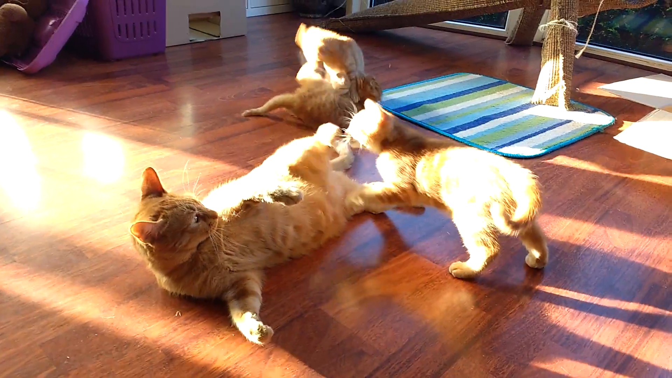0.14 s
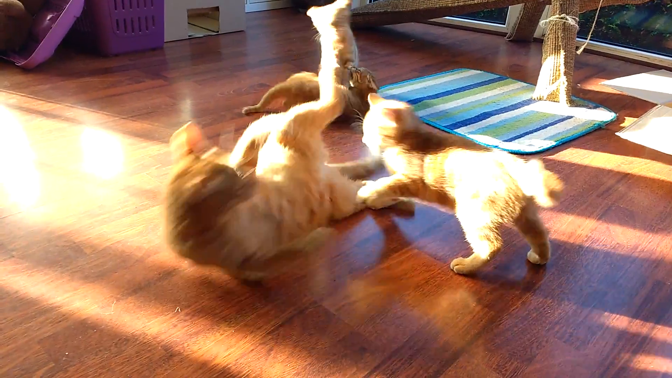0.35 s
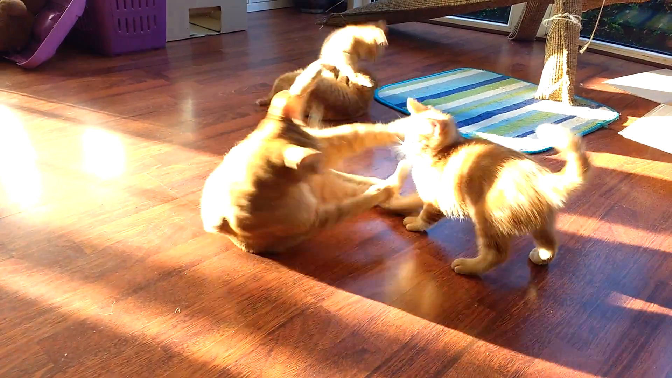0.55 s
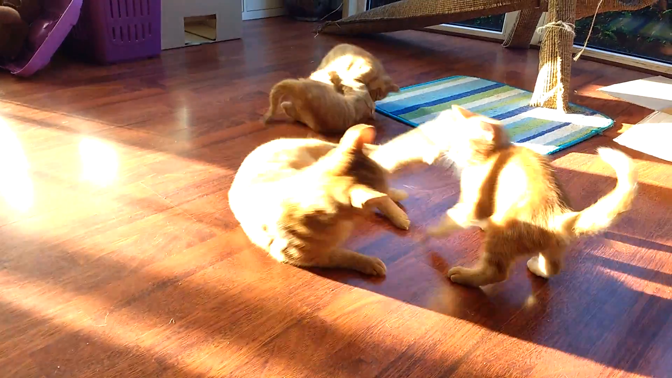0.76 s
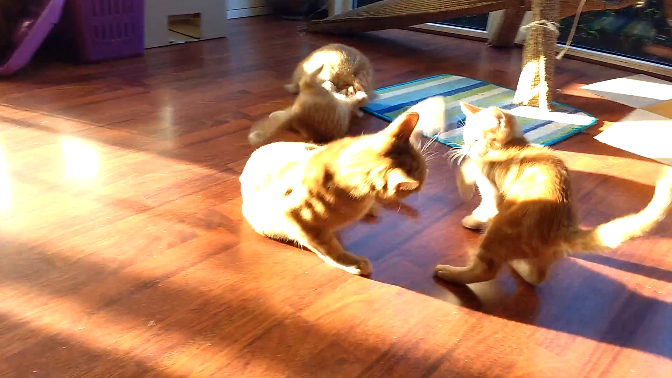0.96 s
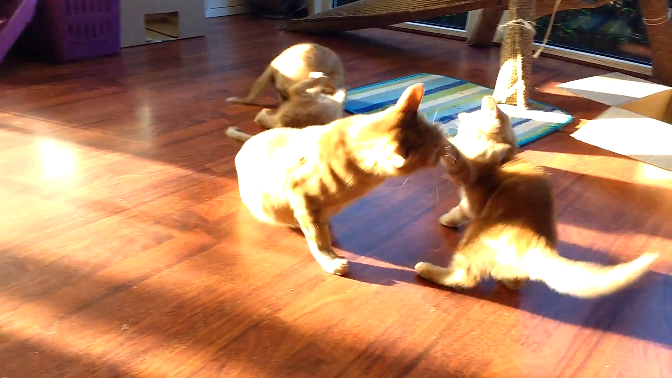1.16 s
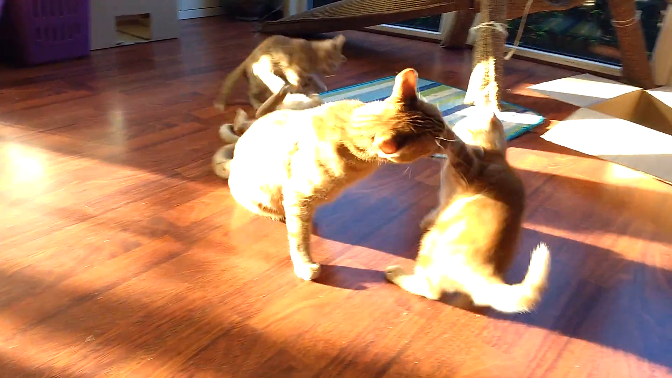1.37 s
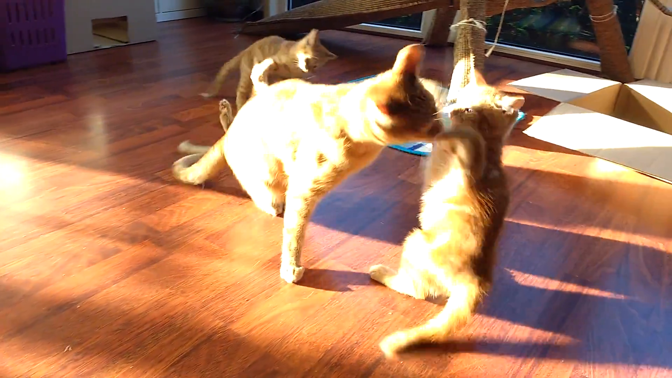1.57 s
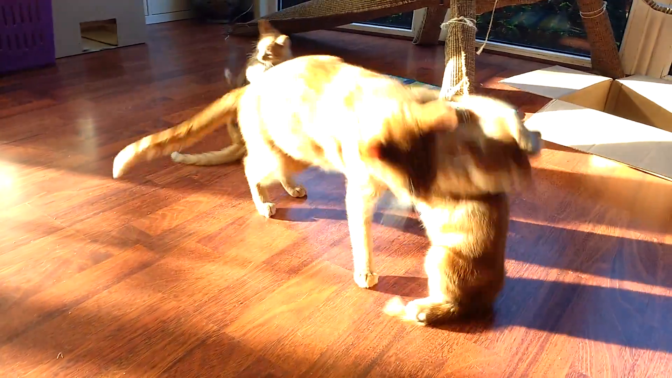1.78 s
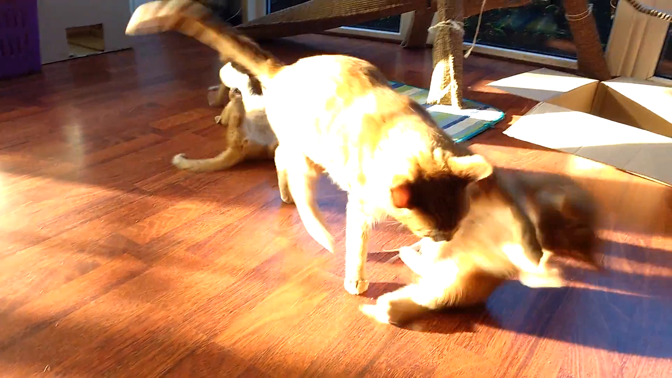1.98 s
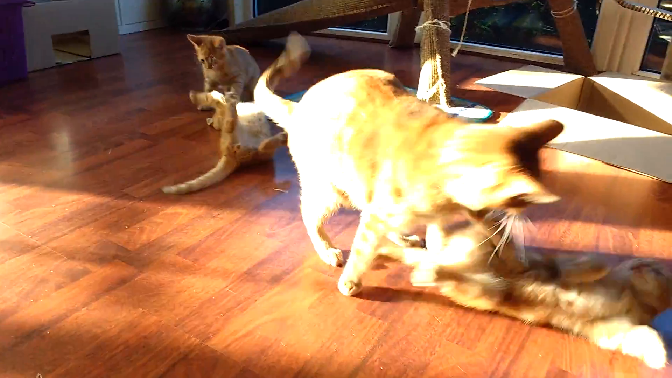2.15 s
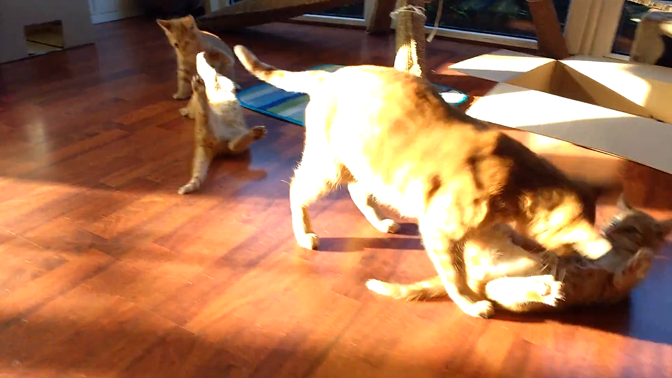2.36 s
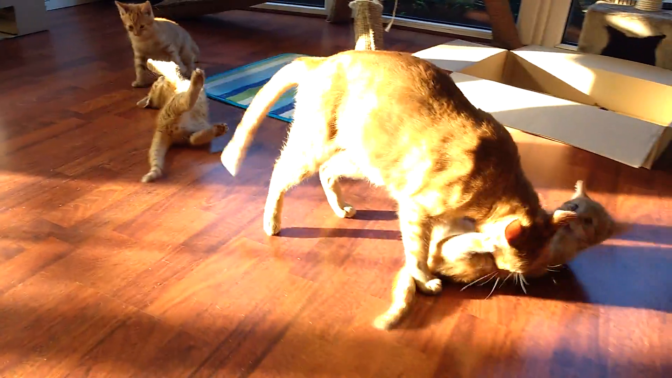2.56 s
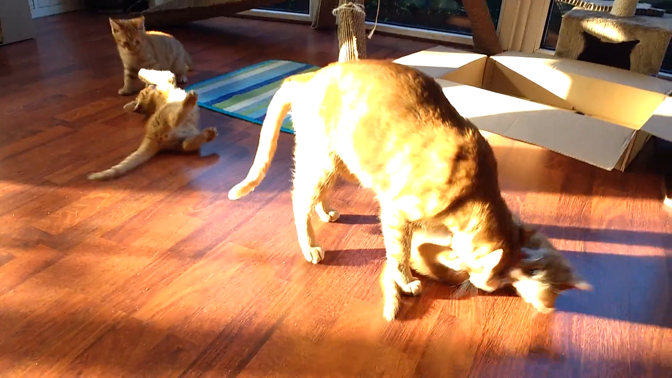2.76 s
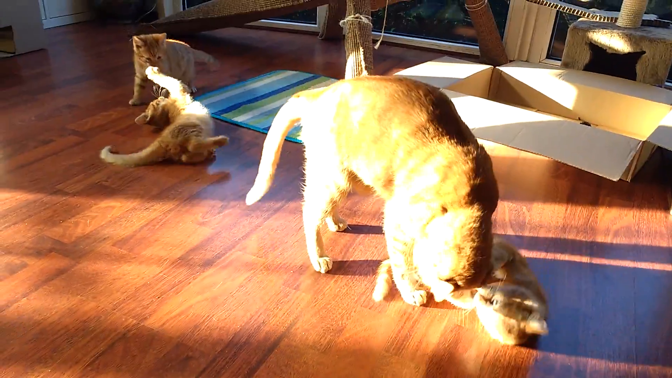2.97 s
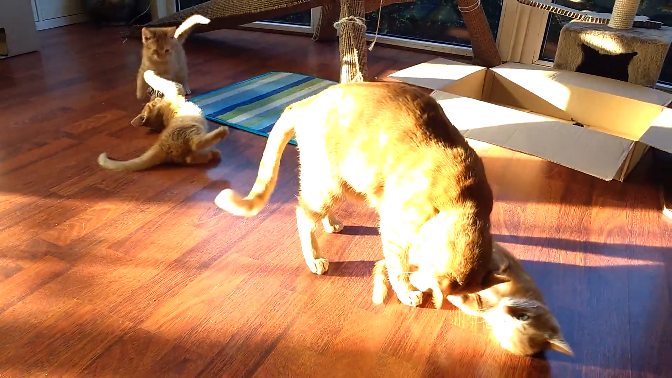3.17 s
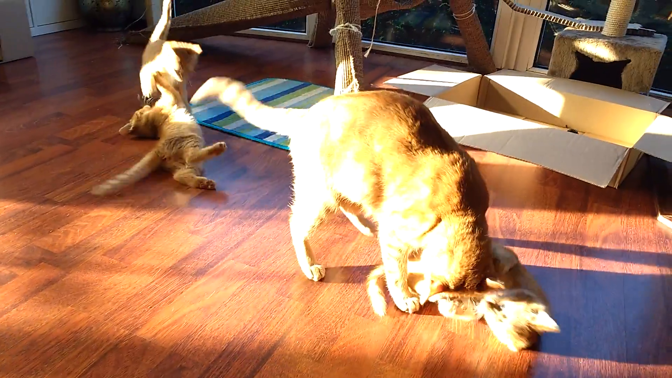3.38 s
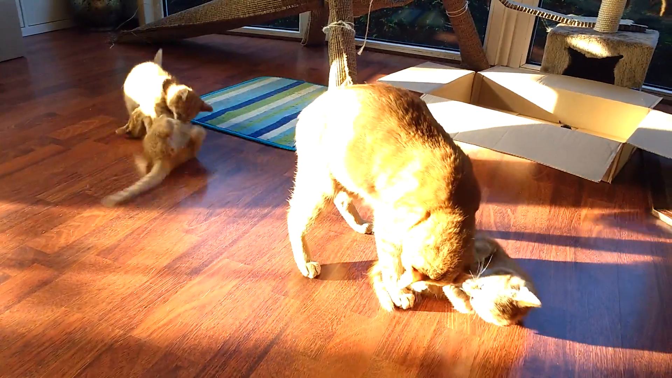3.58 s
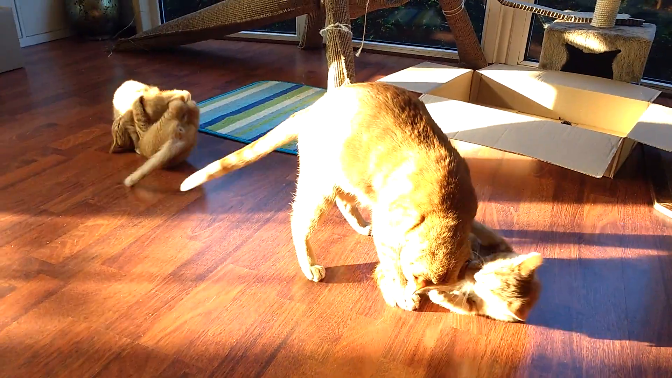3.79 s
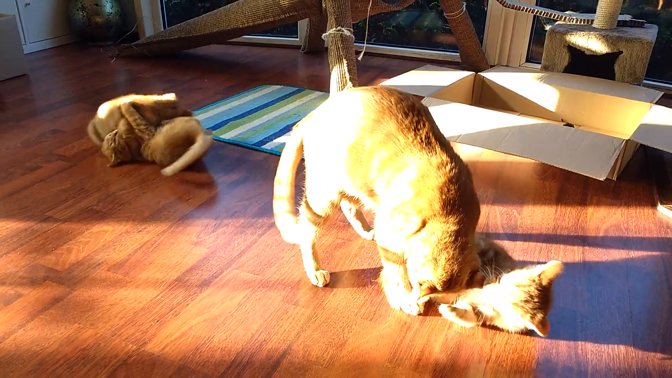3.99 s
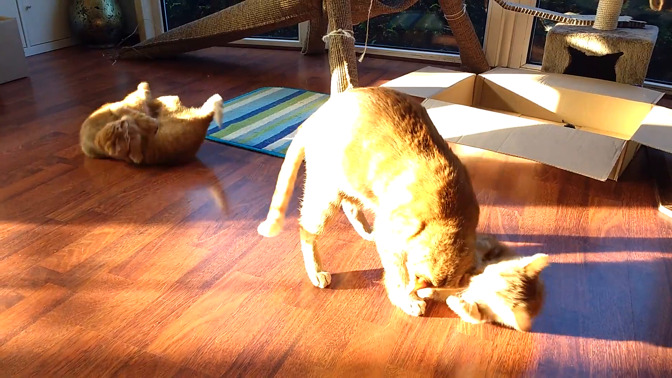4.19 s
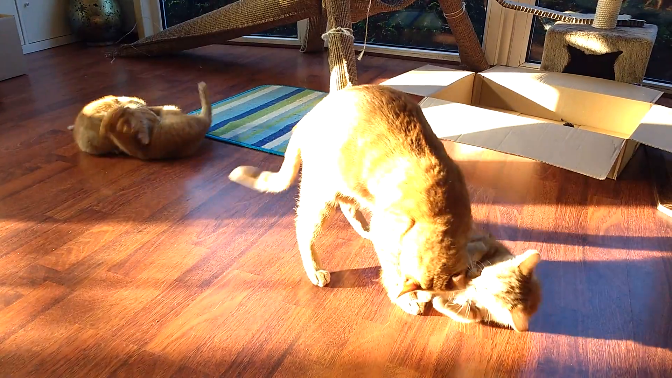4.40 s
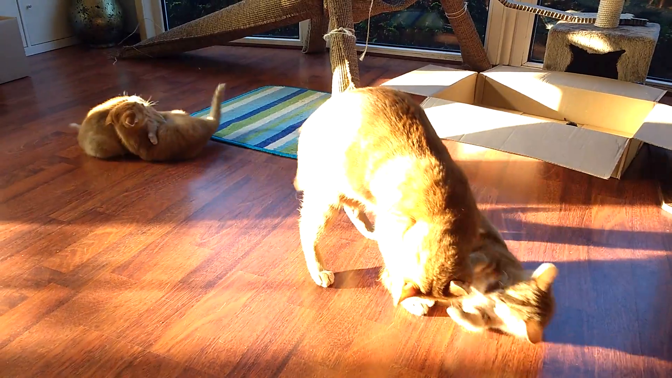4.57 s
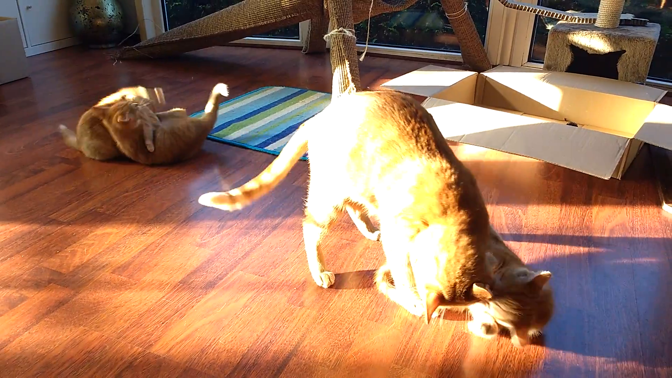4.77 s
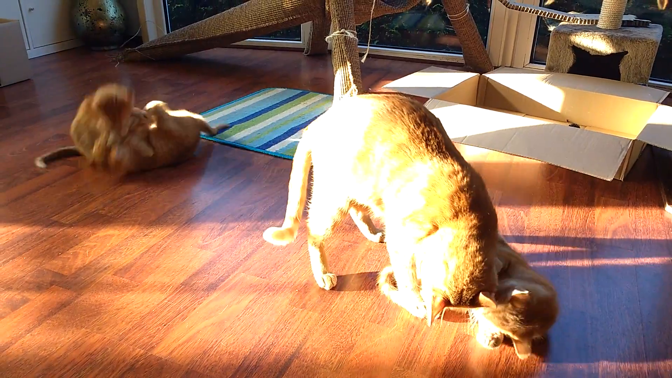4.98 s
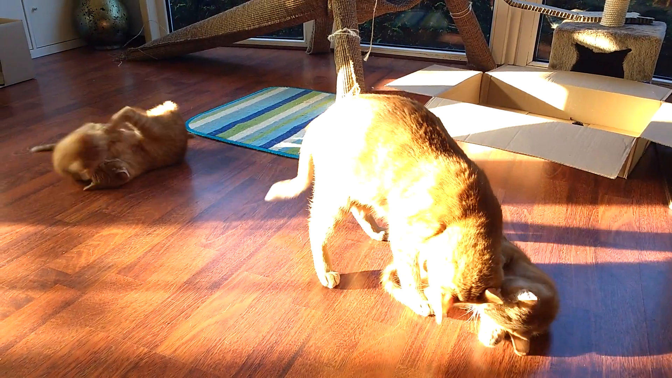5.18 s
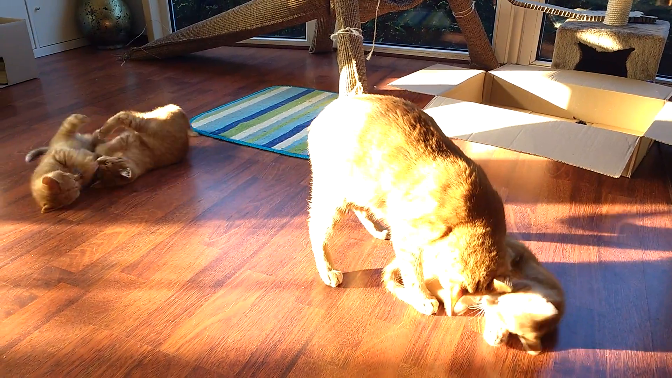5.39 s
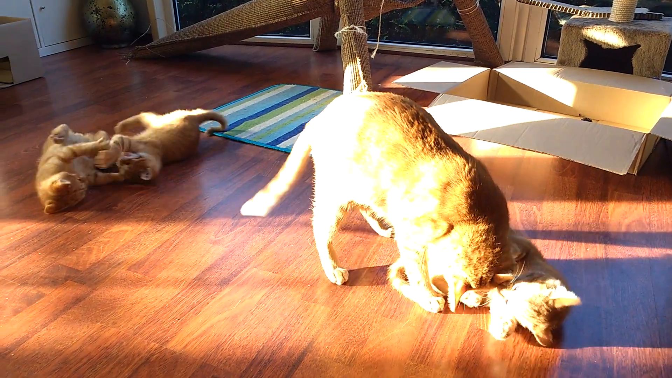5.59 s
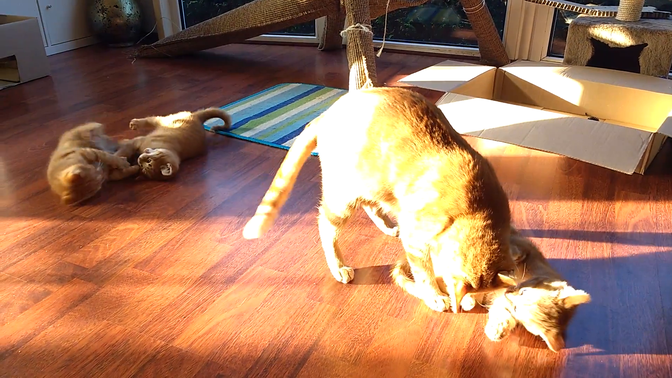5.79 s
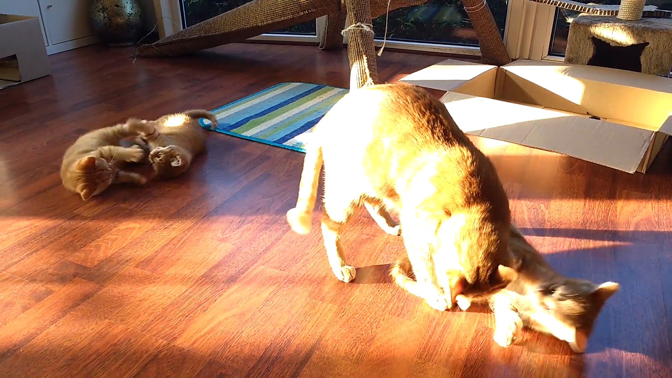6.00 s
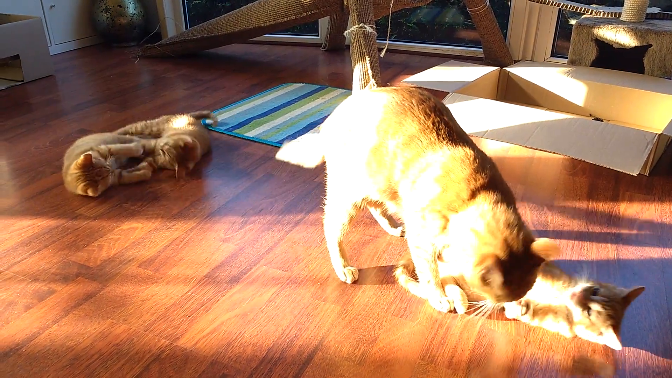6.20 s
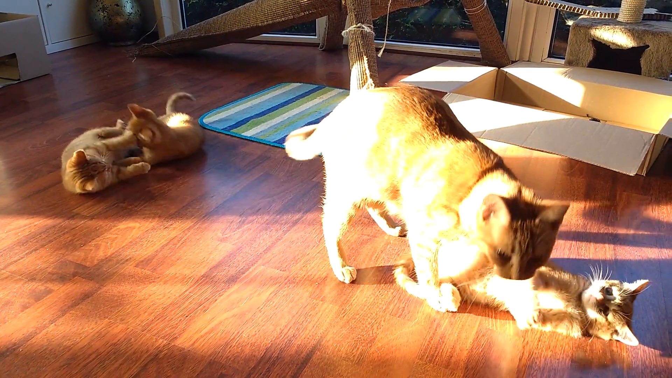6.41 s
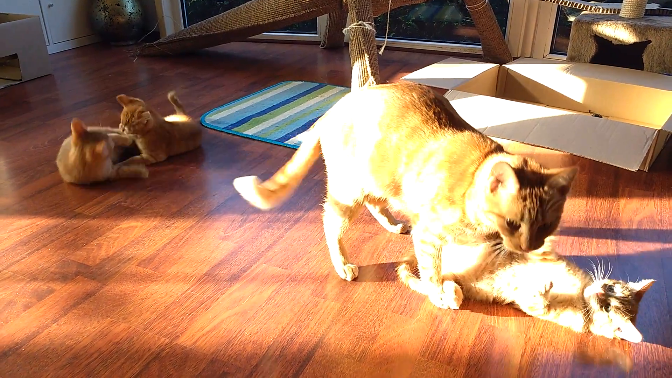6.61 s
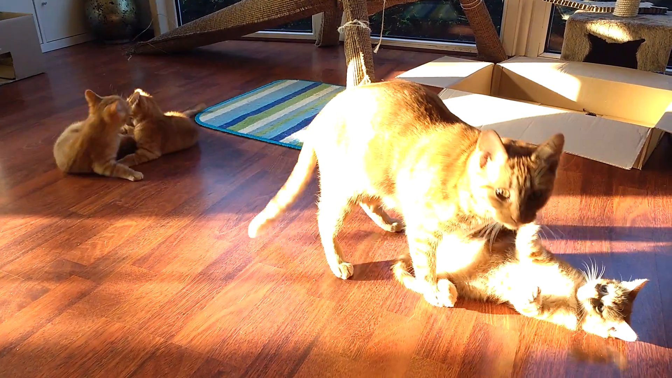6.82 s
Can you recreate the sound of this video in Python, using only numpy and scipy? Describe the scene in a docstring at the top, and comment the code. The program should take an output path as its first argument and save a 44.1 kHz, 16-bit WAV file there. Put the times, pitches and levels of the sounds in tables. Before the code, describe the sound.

Cats wrestle on a wooden floor, heard from nearby in a living room with short reverberation and a faint steady hum. Soft paw padding and fur scuffing swell and ebb throughout. Hollow thumps on the boards start at about 0.4 seconds, with stronger ones near 0.7 and 1.4. Sharp claw clicks at 2 seconds lead into the loudest slapping thump at 2.1, followed by lighter bumps, ticks and brief hissy slides until 3. A quick run of thuds comes from 3.2 to 3.5, and at 3.6 something small and hollow is knocked, with a scuff. Scattered softer bumps follow, then a cluster of dull, heavy thuds from 5.3 to 5.5. Near 6.2 seconds a sharp claw click and a slap land together, trailed by a faint rub of paw pads on varnish and light scuffling until about 7.

```python
"""Cats wrestling on a wooden floor

Bodies and paws thump hollow boards and joists, fur scuffs, claws tick and skid, pads rub the varnish,
and something small and hollow is knocked. The living room reverberates and hums quietly behind.
A phone with two microphone ports subtracts a delayed copy of each from the other for left and right."""
import sys
import numpy as np
from scipy import signal
from scipy.fft import rfft, irfft, next_fast_len
from scipy.io import wavfile
from scipy.ndimage import uniform_filter1d

SR = 44100
rng = np.random.default_rng(int(sys.argv[2]) if len(sys.argv) > 2 else 0)


def transcribe(signal):
    """Save signal, clipped to [-1, 1], as a 16-bit WAV file at the path in sys.argv[1]."""
    frames = np.atleast_2d(signal).T
    limited = np.clip(frames, -1, 1)
    pcm = np.round(limited * 32767).astype(np.int16)
    wavfile.write(sys.argv[1], SR, pcm)


N = 302085
HALVES = np.array([[.5], [-.5]])  # splits a difference between two channels


def gain_of(db):
    return 10 ** (np.asarray(db) / 20)


def unit_rms(x):
    return x / np.sqrt(np.mean(x ** 2) + 1e-20)


def unit_peak(x):
    return x / abs(x).max()


def curve_at(table, hz, column=1):
    columns = np.transpose(table)
    return np.interp(np.log(hz + 1), np.log(columns[0] + 1), columns[column])


def add(mix, start_s, sound):
    part = mix[..., round(start_s * SR):][..., :sound.shape[-1]]
    part += sound[..., :part.shape[-1]]


def port_times(lead_samples):
    """Time axes of both ports for a wave that leads at the first."""
    return (np.arange(SR // 3) - 12 + lead_samples * HALVES) / SR


def ringing(modes, detune):
    """Decaying sines, each randomly detuned."""
    t = np.arange(SR // 3) / SR
    shifts = 1 + detune * rng.standard_normal(len(modes))
    return sum(gain_of(db - 60 * t / t60) * np.sin(2 * np.pi * hz * shift * t)
               for (hz, db, t60), shift in zip(modes, shifts))


def grain(depth_db, samples):
    """Random gain of grip and slip."""
    return gain_of(depth_db * unit_rms(uniform_filter1d(rng.standard_normal(N), samples)))


# Diffuse field between the ports: f/Hz, coherence
COHERENCE = [(40, 1), (100, 0.84), (400, 1), (900, 0.11), (2000, 0.023), (4000, 0.022), (8000, 0.027)]


def diffuse(length, shape_db, size=256):
    """Noise from all sides at both ports, shaped by shape_db(hz, t)."""
    hz = np.fft.rfftfreq(size, 1 / SR)[:, None]
    t = np.arange(length * 4 // size + 5) * size / 4 / SR
    a, b, c, d = rng.standard_normal((len(t), len(hz), 4)).T
    first, unrelated = a + 1j * b, c + 1j * d
    coherence = np.clip(curve_at(COHERENCE, hz), -1, 1)
    second = coherence * first + np.sqrt(1 - coherence ** 2) * unrelated
    spectra = np.array([first, second]) * gain_of(shape_db(hz, t))
    return signal.istft(spectra, nperseg=size, noverlap=size * 3 // 4)[1][:, :length]


# Room air spectrum: f/Hz, relative level/dB
AIR_SPECTRUM = [(30, -82), (70, -82), (150, -86.5), (330, -88), (700, -94.5), (1500, -99), (3000, -101),
                (6000, -105), (8500, -104), (11000, -109), (15000, -111)]


def air():
    """Steady hum and hiss of the house."""
    return diffuse(N, lambda hz, t: curve_at(AIR_SPECTRUM, hz) + 22, size=1024)


# Sliding fur spectra, low to high: f/Hz, relative level/dB
DRAG_SPECTRUM = [(200, -1.5), (500, -1.5), (1000, 7.5), (1900, 0.5), (3500, -10), (8000, -21)]
HISS_SPECTRUM = [(1200, -34), (2800, -22), (4000, -5), (6000, -3.5), (8500, -6.5), (11000, -20),
                 (15000, -32)]
SIZZLE_SPECTRUM = [(7000, -20), (10000, -1), (12000, -3), (15000, -3.5)]


def fur(drag, hiss, sizzle):
    """Fur grips and slips on the boards: three noise bands, one envelope each."""
    catches = grain(depth_db=2.5, samples=400)
    bands = (drag, DRAG_SPECTRUM), (hiss, HISS_SPECTRUM), (sizzle, SIZZLE_SPECTRUM)
    return catches * sum(envelope * unit_rms(diffuse(N, lambda hz, t: curve_at(spectrum, hz)))
                         for envelope, spectrum in bands)


# Floor modes: f/Hz, relative level/dB, t60/s
BOARD_MODES = [(238, -6.5, 0.095), (315.5, 5.5, 0.047), (408, 3.5, 0.042), (436, -3.5, 0.052),
               (530, -4, 0.067), (591, -5.5, 0.077)]
JOIST_MODES = [(97.7, -9, 0.25), (123.5, 0, 0.084), (168, 2, 0.097)]


def floor(board_detune=0, joist_detune=0):
    """Impulse responses of boards and joists; each spot shifts the modes a little."""
    return ringing(BOARD_MODES, board_detune), ringing(JOIST_MODES, joist_detune)


def padding(pats_per_s=250):
    """Many soft pats of paws and flanks shake the floor."""
    hits = rng.random(N) < pats_per_s / SR
    pats = hits * gain_of(2 * rng.exponential(1, N)) * rng.choice([-1, 1], N)
    boards, joists = floor()
    soft_pat = np.convolve(boards + 0.24 * joists, np.hanning(70))
    return unit_rms(signal.oaconvolve(pats, soft_pat)[:N])


# Wrestling envelope: t/s, relative drag level/dB, relative padding level/dB
WRESTLING = [(0.0, -65.5, -82), (0.48, -59, -59), (0.63, -56.5, -55), (0.97, -59, -42), (1.2, -56.5, -44.5),
             (1.6, -56, -48), (1.95, -56.5, -42.5), (2.312, -62.5, -48), (2.8, -52.5, -44.5),
             (3.03, -62, -50.5), (3.59, -63.5, -76), (3.85, -55.5, -50), (4.25, -59.5, -55),
             (4.58, -56, -45), (5.02, -63.5, -59), (5.5, -59.5, -48), (6.449, -62.5, -69), (6.85, -58, -52)]


def tussle():
    """Continuous padding and scuffing, with single slides on top."""
    times, *levels = np.transpose(WRESTLING)
    drag_db, pad_db = (np.interp(np.arange(N) / SR, times, db) for db in levels)
    steady_hiss = gain_of(-57.5 + 0.5 * (drag_db + 51.5))  # follows half the drag's swing in dB
    drag = gain_of(drag_db) + slides(column=2)
    hiss = steady_hiss + slides(column=3)
    sizzle = steady_hiss + slides(column=4)
    return 0.46 * gain_of(pad_db) * padding() + 0.94 * fur(drag, hiss, sizzle)


# Floor blows: t/s, level/dB, contact/ms, joist boom offset/dB, slap offset/dB, port 1 over 2/dB
FLOOR_BLOWS = [(0.415, -31.5, 2.2, -15, -9, -5), (0.508, -30.5, 1.2, -8, -3.5, -12),
               (0.57, -25.5, 3.3, -16, -16, -3), (0.648, -36, 3.1, -20, -3, 0),
               (0.66, -15, 3.5, -10, -0.5, -2.5), (0.735, -34, 2, -25, -1, -1),
               (0.795, -34.5, 0.76, -1.5, -0.5, 4), (0.999, -25.5, 1.4, -37, -14, -11),
               (1.05, -24.5, 2.06, -21, -16, -9), (1.331, -27, 1.7, -38, -13, -12),
               (1.3548, -16, 1, -49, -12.5, 0), (1.421, -25.5, 2, -15, -1, -4),
               (1.744, -32, 1.4, -9, -9, 2), (1.761, -30, 1.6, -1.5, -1, -6), (1.769, -30.5, 3.1, 1, -3, 0),
               (1.89, -31.5, 1.6, -27, -7, -11), (1.979, -19, 2.4, -32, -25, -9),
               (2.1132, -7.5, 1.25, -13.5, 5.5, -1), (2.276, -37, 0.65, -1, 7, 1),
               (2.417, -20.5, 0.66, -32, -19, -10), (2.5844, -30, 0.43, -17, -0.5, 8),
               (2.656, -21, 1.9, -38, -22, -7), (2.681, -23.5, 1.45, -35, -9, -8),
               (2.72, -46, 2.2, -28, -7, 5), (3.226, -26, 0.59, -16, -7.5, -7),
               (3.246, -22.5, 1.85, -31, -15, -1), (3.28, -19.5, 1.8, -40, -19, -8),
               (3.304, -27.5, 1.9, -35, -20, -3), (3.399, -24, 1.8, -35, -15, -7),
               (3.429, -26.5, 1.44, -20, -5, -3), (3.462, -34, 2.2, -5, -5, 2),
               (3.597, -34.5, 1.7, -3.5, -4, 0), (3.634, -20, 1.87, -23, 3.5, 2),
               (3.6461, -24, 1.64, -29, 6, 7), (3.659, -30, 1.57, -6, 3, -6),
               (4.246, -25, 2.2, -37, -22, 0), (4.349, -31.5, 0.9, -36, -16, -16),
               (4.696, -25, 2.6, -40, -11, -5), (4.914, -35.5, 1, -4, -8, -9), (5.037, -39, 9.4, 5, -13, 0),
               (5.075, -36, 2, -5, -3, -3), (5.337, -17, 3.2, -14, -15, 0),
               (5.343, -17.5, 6.7, -14, 3.5, 0.5), (5.365, -23.5, 10.5, -8, 0, -2),
               (5.398, -31, 10, 2, 7, -7), (5.466, -22.5, 2.3, -18, -12, 1),
               (5.477, -31.5, 1.53, -21, 0, -2), (5.808, -29, 1.9, -34, -29, -12.5),
               (5.952, -36, 2.1, -30, -4, -2), (6.1557, -27.5, 0.72, -6, 13, 11),
               (6.158, -23, 3.25, -6.5, 3, 3.5)]


def thumps():
    """A short push rings boards and joists; its sudden change is heard as a slap."""
    blows, slaps = np.zeros((2, 2, N))
    for start_s, db, contact_ms, boom_db, slap_db, lean_db in FLOOR_BLOWS:
        lean = gain_of(lean_db * HALVES)
        t = port_times(lead_samples=0.75 - 1.2 * slap_db)  # barer slaps lie towards port 2
        progress = np.clip(t * 1000 / contact_ms, 0, 1)
        push = np.sin(np.pi * progress) ** 2
        boards, joists = (unit_peak(signal.oaconvolve(push, ring[None])[:, :t.shape[1]])
                          for ring in floor(board_detune=0.038, joist_detune=0.047))
        phase = np.pi * progress ** 0.84  # starts faster than it ends
        slap = -(np.sin(2 * phase) + 0.68 * np.sin(phase)) * np.sin(phase)  # change plus plain push
        add(blows, start_s, lean * gain_of(db) * (.5 * boards + gain_of(boom_db) * joists))
        add(slaps, start_s, lean * gain_of(db + slap_db) * slap)
    return blows, slaps


# Claws on varnish: t/s, level/dB, f/Hz, ring decay/cycles, skid t60/ms
CLAW_TICKS = [(0.649, -36, 3730, 1.3, 45), (1.356, -31, 1920, 2.3, 35), (2.0251, -15.5, 5750, 0.91, 9.8),
              (2.0285, -16, 7500, 0.65, 11), (2.041, -38, 6000, .5, 15), (2.1129, -24, 3700, 1.2, 3.4),
              (2.124, -30, 7000, 0.35, 18), (2.268, -38, 3350, 0.39, 10), (2.275, -15.5, 4320, 0.23, 2.1),
              (2.2787, -25.5, 5850, 0.35, 4.1), (2.418, -33, 9000, 0.52, 8), (2.427, -29, 9000, 0.57, 15),
              (2.583, -29, 5530, 0.35, 8.5), (2.605, -31, 6500, .5, 10), (2.68, -34, 2140, 2.4, 23),
              (2.749, -31, 6700, 0.64, 11), (2.921, -32, 6550, 0.97, 19), (3.371, -33, 3700, 2.5, 3.2),
              (3.38, -32, 3470, 2.1, 6.4), (3.633, -20, 3860, 1.1, 19), (3.632, -35, 7200, 1.2, 16),
              (3.647, -29.5, 6350, 1.7, 28), (3.824, -39, 14000, 1, 5), (3.833, -41, 14100, 1, 5),
              (3.856, -39, 9300, 1.7, 7.8), (6.1555, -9, 5800, 0.86, 1.2)]


def ticks(length=3000, skid_db=-11):
    """A claw clicks with a brief bright ring, then skids a little."""
    out = np.zeros((2, N))
    t = np.maximum(port_times(lead_samples=3.9)[:, :length], 0)
    for start_s, db, hz, cycles, t60_ms in CLAW_TICKS:
        ring = np.sin(2 * np.pi * hz * t) * np.exp(-t * hz / cycles)
        click = signal.sosfilt(signal.butter(4, 0.37 * hz, "high", fs=SR, output="sos"), ring)
        skid = gain_of(skid_db - 60000 * t[0] / t60_ms) * rng.standard_normal(length)
        skid[0] = 1  # first contact
        add(out, start_s, gain_of(db) * unit_peak(signal.oaconvolve(click, skid[None])[:, :length]))
    return out


# Fur and claw slides: t/s, length/s, relative levels of drag/dB, hiss/dB, sizzle/dB
FUR_SLIDES = [(0.99, 0.2, -59, -65, -63), (1.347, 0.039, -51, -53, -51), (1.411, 0.041, -47.5, -60, -52),
              (1.895, 0.18, -71, -62, -57), (2.016, 0.084, -89, -46.5, -50), (2.232, 0.16, -51, -51, -55),
              (2.381, 0.058, -48.5, -45.5, -44.5), (2.403, 0.097, -48.5, -54.5, -49),
              (2.575, 0.078, -52, -55, -69), (2.663, 0.1, -55.5, -55.5, -57),
              (3.217, 0.31, -54.5, -63, -68), (3.63, 0.088, -41.5, -54, -80), (4.68, 0.093, -50, -64, -75),
              (5.855, 0.097, -57.5, -82, -80), (6.187, 0.07, -46.5, -63, -76), (6.246, 0.14, -65, -95, -85)]


def slides(column, ramp_share=.12, fade_db=-11.5):
    """One band's envelope: each slide swells, fades and is gritty as hairs and claws catch."""
    out = np.zeros(N)
    for row in FUR_SLIDES:
        start_s, length_s = row[:2]
        progress = np.arange(0, length_s, 1 / SR) / length_s
        ramps = np.minimum(np.minimum(progress, 1 - progress) / ramp_share, 1)
        add(out, start_s, ramps * gain_of(row[column] + fade_db * progress))
    return out * grain(depth_db=4.6, samples=50)


# Knocks on the hollow body: t/s, level/dB
HOLLOW_KNOCKS = [(3.634, -17), (3.646, -27.5), (3.659, -31), (5.475, -35)]
# Its modes: f/Hz, relative level/dB, t60/s
HOLLOW_MODES = [(453, 7.5, 0.044), (518, 5, 0.093), (677, 1, 0.06), (807, 5.5, 0.034), (1022, -1.5, 0.068),
                (1430, -6, 0.013)]


def knocks():
    """A quick push rings a small hollow body."""
    out = np.zeros(N)
    for start_s, db in HOLLOW_KNOCKS:
        knock = np.convolve(np.hanning(14), ringing(HOLLOW_MODES, detune=0.036))
        add(out, start_s, gain_of(db) * unit_peak(knock))
    return out


# Pad rubs: t/s, length/s, level/dB, start f/Hz, end f/Hz, bandwidth/Hz
PAD_RUBS = [(3.91, .2, -70, 14150, 14900, 90), (6.2, .17, -58, 1740, 1960, 140),
            (6.27, .12, -61, 1250, 1380, 160), (6.32, .05, -62, 3350, 3250, 200)]


def rubs():
    """Paw pads rub the varnish: noise in narrow resonances that creep in pitch."""
    out = np.zeros(N)
    for start_s, length_s, db, from_hz, to_hz, width_hz in PAD_RUBS:
        progress = np.arange(0, length_s, 1 / SR) / length_s
        carrier = np.exp(2j * np.pi * np.cumsum(from_hz + (to_hz - from_hz) * progress) / SR)
        pole = np.exp(-np.pi * width_hz / SR)
        noise = [1, 1j] @ rng.standard_normal((len(progress), 2)).T
        narrow = signal.lfilter([1 - pole], [1, -pole], noise)
        swell = np.sqrt(np.sin(np.pi * progress))
        add(out, start_s, gain_of(db) * swell * unit_rms((carrier * narrow).real))
    return out


# Living room decay: f/Hz, t60/s
ROOM_DECAY = [(100, 0.19), (300, 0.28), (1000, 0.25), (3000, 0.28), (8000, 0.13)]


def room(source, tails=3, turns_per_s=2.3):
    """Diffuse tails, each band at its own decay rate; they take turns as the cats move about."""
    out = np.zeros((2, N))
    turn = np.arange(N) / SR * turns_per_s
    onset = np.clip((np.arange(SR // 2) - 60) / 250, 0, 1)
    for k in range(tails):
        tail = onset * diffuse(SR // 2, lambda hz, t: -60 * t / curve_at(ROOM_DECAY, hz))
        share = np.sqrt(2 / tails) * np.cos(np.pi * (turn + k / tails))
        out += signal.oaconvolve((source * share)[None], tail / np.linalg.norm(tail[0]))[:, :N]
    return out


def scene():
    """Direct sound, reverberation and room air at both ports."""
    blows, slaps = thumps()
    claws = ticks()
    scuffle = tussle() + rubs()
    blows = blows + knocks()
    # Slaps are aimed, so less of them fills the room.
    send = gain_of(3) * blows + gain_of(-6.5) * slaps + gain_of(-3) * claws + gain_of(-0.5) * scuffle
    return blows + slaps + claws + scuffle + room(send.mean(0)) + air()


# Phone ports: f/Hz, port 1 over 2/dB, share of delayed port subtracted, left over right/dB
PORT_RESPONSE = [(80, 3.5, 0.99, 0), (317, 6.5, 1, 2.5), (1465, 11, 0.56, -5.5), (2790, 19, 0.97, 1),
                 (4670, 9.5, 0.26, -10.5), (8650, 19, 0.13, -16), (11200, -2, 0.053, -2),
                 (15200, -2, 0.18, -5)]


def record(dry, spacing_s=1 / 2530, low_cut_hz=70, high_cut_hz=15620):
    """Unequal ports, each minus the other delayed by their spacing; a bass lift offsets the loss."""
    size = next_fast_len(N + 8192)
    hz = np.fft.rfftfreq(size, 1 / SR)
    mismatch_db, share, lean_db = (curve_at(PORT_RESPONSE, hz, column) for column in (1, 2, 3))
    ports = rfft(dry, size) * gain_of(HALVES * mismatch_db)
    delay = np.exp(-2j * np.pi * hz * spacing_s)
    differences = ports - share * delay * ports[::-1]
    bass_lift = (1j * hz + 420) / (1j * hz + 60) / 2
    low_cut = (hz ** 2 / (hz ** 2 - 1.3j * hz * low_cut_hz - low_cut_hz ** 2)) ** 2
    stereo = irfft(differences * bass_lift * low_cut * gain_of(HALVES * lean_db), size)[:, :N]
    high_cut = signal.firwin(511, high_cut_hz, window=("kaiser", 9), fs=SR)
    return signal.oaconvolve(stereo, high_cut[None], "same")


dry = scene()
out = record(dry)
transcribe(out)
```